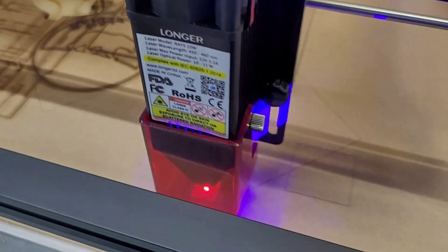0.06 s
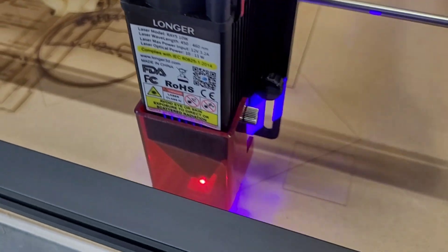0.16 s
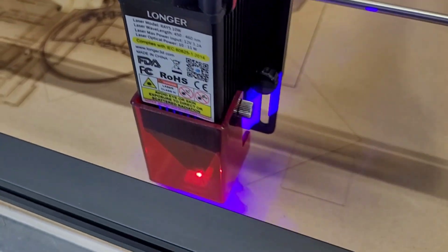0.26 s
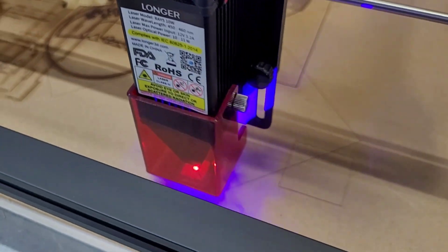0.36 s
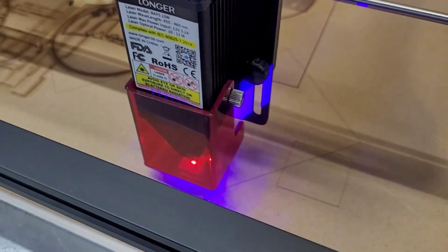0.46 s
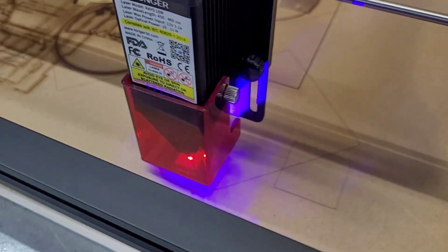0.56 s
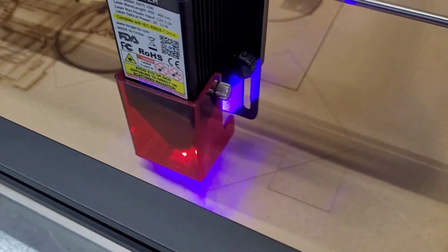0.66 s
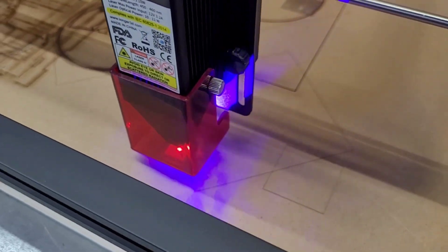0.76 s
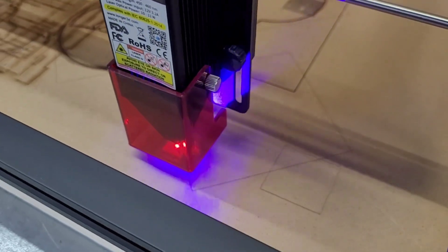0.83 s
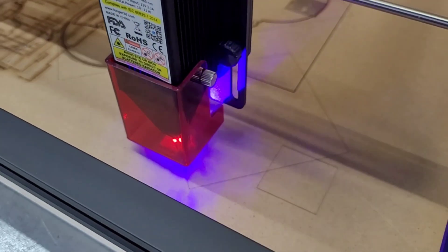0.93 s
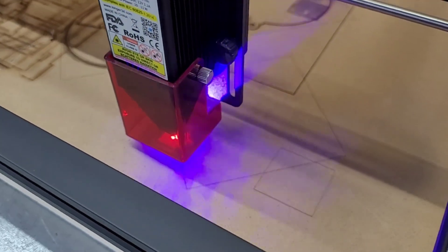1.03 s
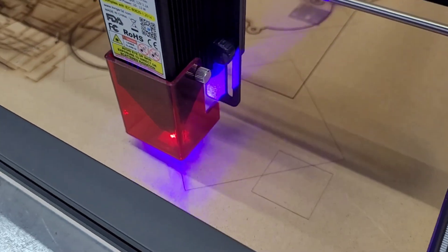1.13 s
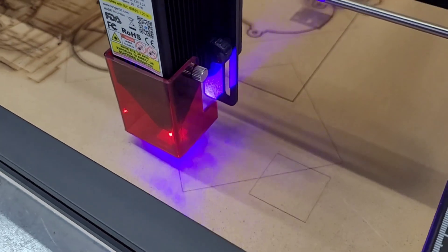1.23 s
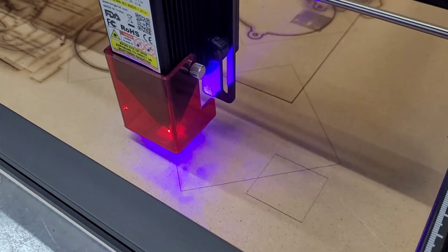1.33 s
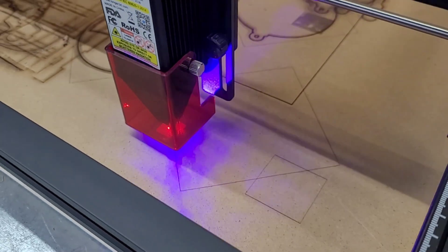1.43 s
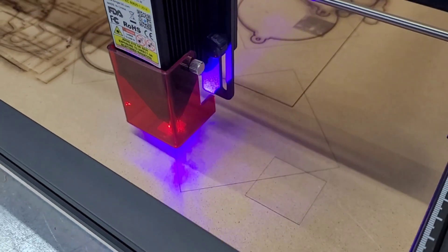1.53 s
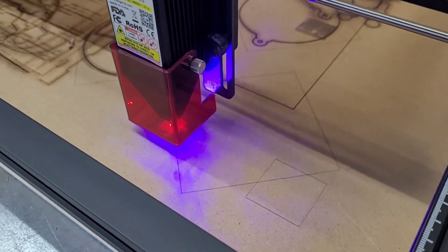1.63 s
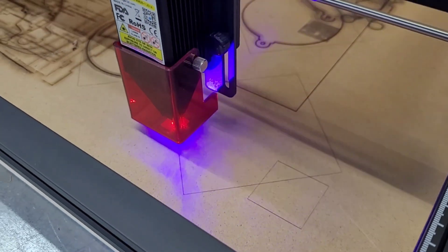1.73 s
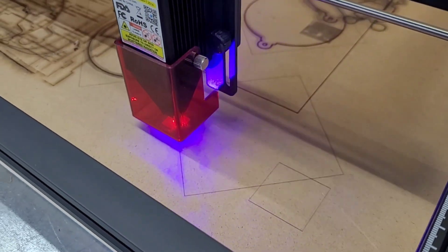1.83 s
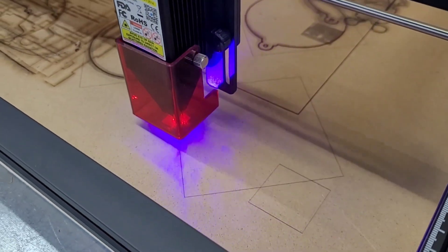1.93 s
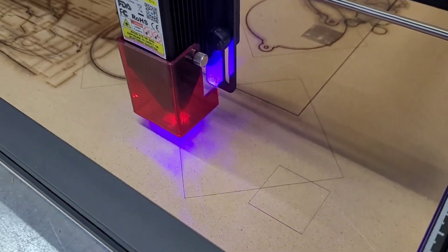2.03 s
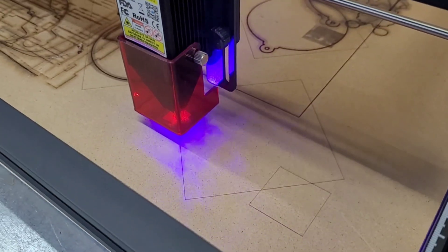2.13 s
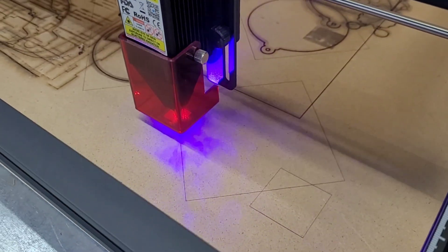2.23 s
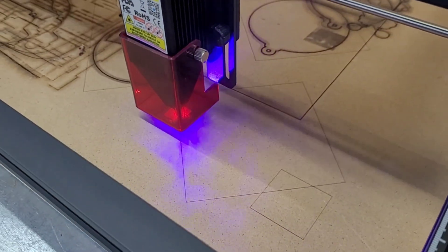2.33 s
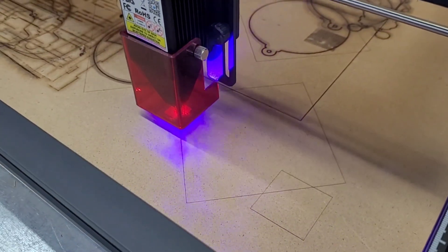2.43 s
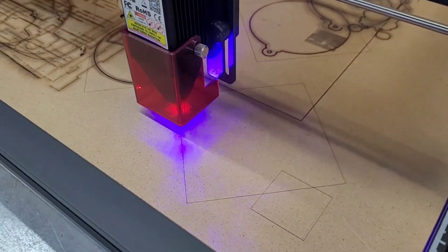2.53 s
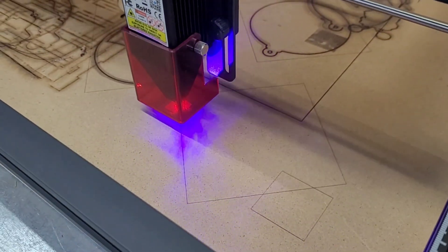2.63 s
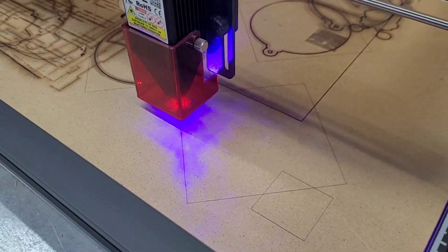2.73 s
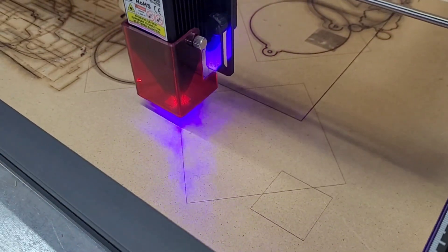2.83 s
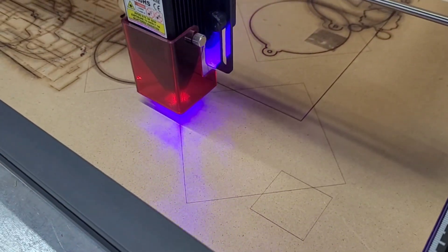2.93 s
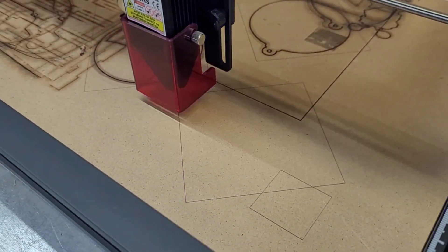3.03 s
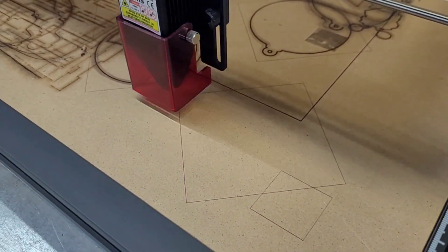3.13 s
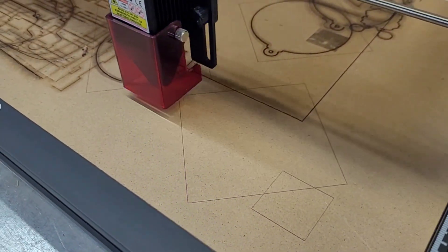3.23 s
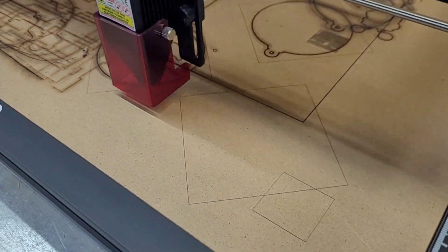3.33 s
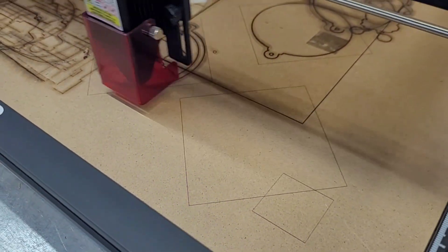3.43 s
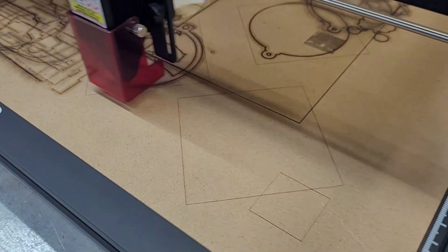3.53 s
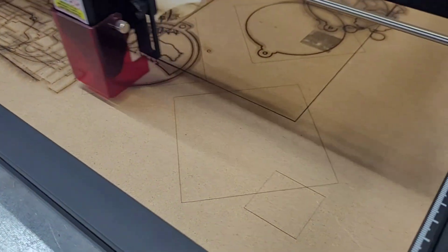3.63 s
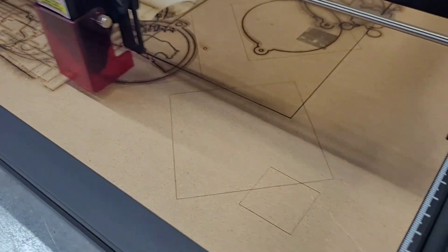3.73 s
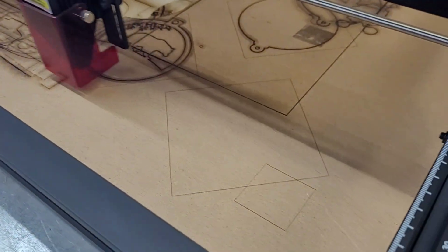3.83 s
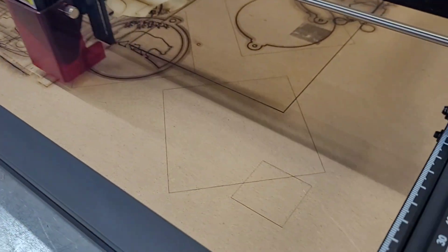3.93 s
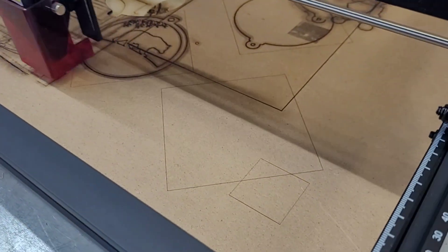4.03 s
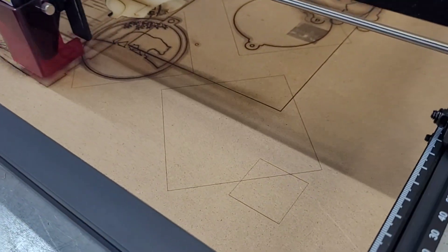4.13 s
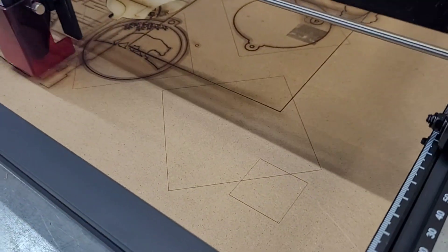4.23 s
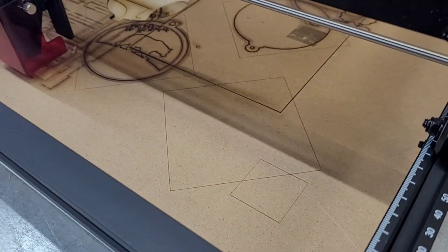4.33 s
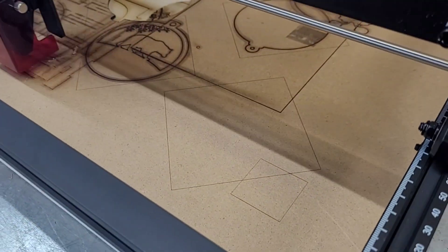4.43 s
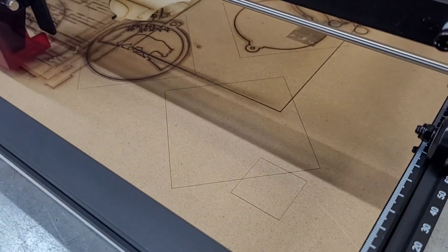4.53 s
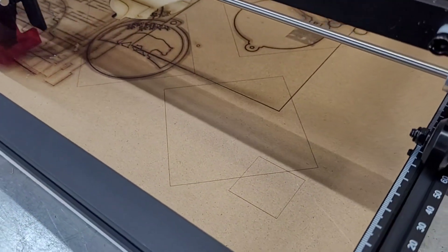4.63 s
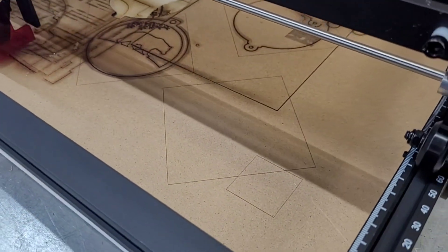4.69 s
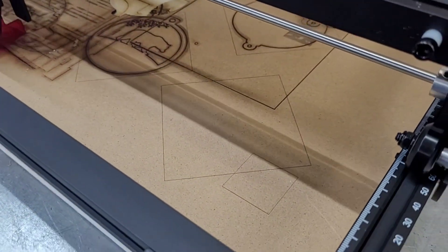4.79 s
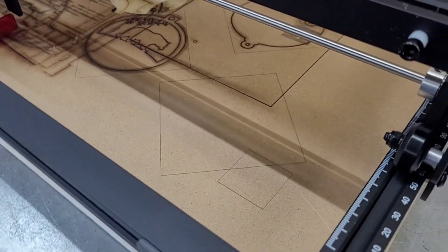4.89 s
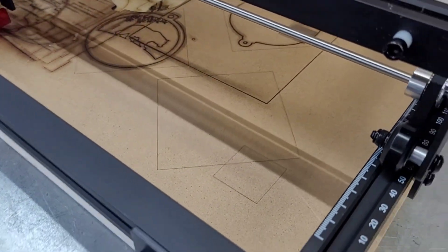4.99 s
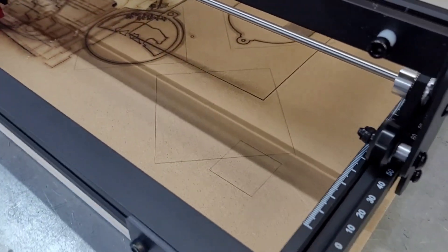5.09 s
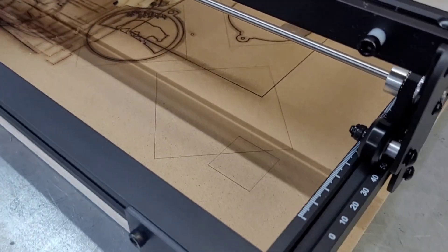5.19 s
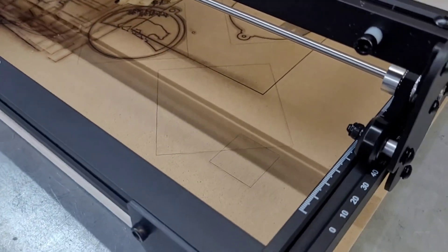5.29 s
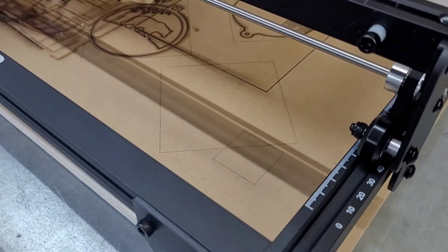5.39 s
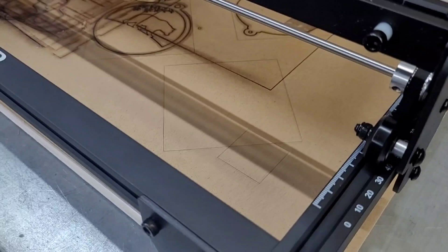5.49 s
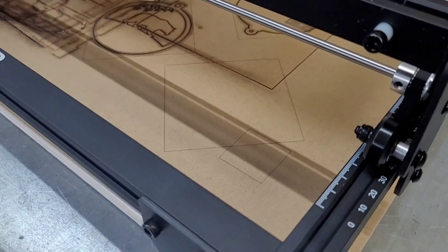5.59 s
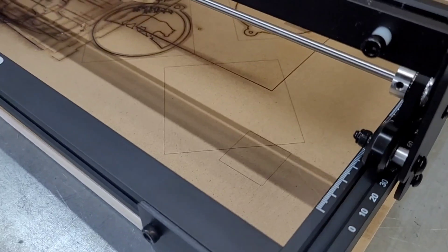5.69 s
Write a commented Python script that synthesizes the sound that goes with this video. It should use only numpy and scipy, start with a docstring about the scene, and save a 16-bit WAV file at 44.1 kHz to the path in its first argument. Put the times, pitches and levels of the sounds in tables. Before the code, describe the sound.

A small laser engraver whines at a steady, buzzy high pitch, cuts off abruptly, knocks twice, then its carriage hums away along the rail.

```python
"""Laser engraving and carriage travel

A small diode laser engraver scores a line in a wooden sheet, heard from close by in a workshop.
The pulsed beam whines at 1 kHz as a stack of harmonics, over fan noise and two slowly stepping motors.
Then the beam goes off, the head jogs twice with a knock that rings the frame's modes, and travels off
along its rail: motor and belt tones glide with its speed over a low hum, and it brakes at the end."""
import sys
import numpy as np
from scipy import signal
from scipy.fft import rfft, irfft
from scipy.io import wavfile
from scipy.ndimage import uniform_filter1d

SR = 44100
rng = np.random.default_rng(int(sys.argv[2]) if len(sys.argv) > 2 else 0)


def digitize_waveform(pressure):
    """Quantize a signal to 16-bit integers and store it at the path in sys.argv[1].

    Rows of a 2-D input are taken as channels; values are limited to [-1, 1].
    """
    field = np.atleast_2d(pressure).T
    bounded = np.clip(field, -1, 1)
    quanta = np.round(bounded * 32767).astype(np.int16)
    wavfile.write(sys.argv[1], SR, quanta)


N = 253575
TIME = np.arange(N) / SR
FREQS = np.maximum(np.arange(N // 2 + 1) * SR / N, 1)

# Hums of the workshop. Each row: frequency in Hz, level in dB.
ROOM_HUM = [(53, -68), (120, -66.5), (240, -62), (496, -64.5)]

# Air noise at the left and right listening ports. Each row: frequency in Hz, likeness of the ports 0-1,
# phase lead of the left in radians.
PORTS = [(30, 0.27, 4.5), (197, 0.85, -0.5), (475, 1, 1.5), (905, 1, 1), (1320, 1, 2.5), (2000, 0.89, 1.33),
         (2320, 0.73, 0.5), (3360, 0.12, 3), (8000, 0.067, 7)]
# Rush of air while the beam burns, at mid-cut. Each row: frequency in Hz, level in dB per Hz,
# left-right difference in dB.
BURN_AIR = [(30, -92.7, -6), (83, -88.5, -1), (222, -77.5, 2), (910, -77, 1.2), (1320, -71.5, 0),
            (1650, -76.5, 7.5), (1940, -66, 2.5), (2270, -77, 5.5), (2820, -76.5, 2.5), (4240, -89, 1.5),
            (7370, -85, -3.5), (9460, -93, 2), (10750, -88, -5), (14200, -86.5, 9.5)]
# Rush of the fan and the rolling carriage with the beam off, before IDLE_AIR_DB and the receding.
# Each row: frequency in Hz, level in dB per Hz, left-right difference in dB.
IDLE_AIR = [(25, -90.6, -4), (55, -75, -3), (169, -84.5, -2), (278, -83.5, -2), (900, -80.5, 0.5),
            (1140, -78.5, 2), (1300, -73.5, 7.5), (1650, -79.5, 5), (1930, -74, 12.5), (2390, -80, 14.5),
            (3300, -88.5, 2.5), (6540, -95.5, -0.5), (8800, -100.3, 1.5), (14300, -99.5, 5)]
# Fan blade tone, faster once the laser's load is gone. Each row: time in seconds, frequency in Hz, level in dB.
FAN_TONE = [(0, 644, -55.5), (3.11, 640, -55.5), (3.45, 655, -60), (5.75, 655, -59)]
BURN_AIR_DB_PER_S, HISS_DB_PER_S = -0.73, 0.44   # along the cut the air eases, while its hiss gains on the rush
IDLE_AIR_DB, AIR_DB_PER_S = 3, -1.5   # gain as the head sets off, and its change as the head recedes
STRAIN_HISS_DB = 3   # the rollers hiss more under strain

# Moves: two short jogs, then the long travel. Each row: start in seconds, end in seconds,
# acceleration in full speeds per second, motor level in dB.
MOVES = [(3.09, 3.18, 9, 3), (3.18, 3.238, 12, -6), (3.238, 5.8, 4.6, 1.5)]
CORNER_SPEED = .55   # share of full speed at which a move starts and ends
STRAIN_SPAN = 0.12   # the drive strains fully this far (share of full speed) below full speed

# Modes of the frame. Each row: frequency in Hz, level in dB, decay time t60 in seconds.
FRAME = [(249, -10, 0.087), (354, 4, 0.034), (438, 10, 0.029), (650, 10, 0.015), (937, 1, 0.026),
         (1330, -16, 0.016), (1840, 2, 0.038), (2680, 3, 0.0073), (3400, -35, 0.009), (6300, 1, 0.026)]
# Knocks of the carriage. Each row: time in seconds, level of the blow in dB, contact cut-off in Hz.
KNOCKS = [(1.809, -39, 650), (3.169, -42, 2500), (5.076, -48.5, 2000)]
# Taps, clicks and short rattles of belt and rollers. Each row: time in seconds, level in dB,
# centre frequency in Hz, decay in seconds.
CLICKS = [(1.8085, -27, 420, .006), (1.8095, -43, 1300, .002), (3.168, -30, 3600, .0015),
          (3.183, -51, 7000, .015), (3.266, -43, 2200, .016), (3.275, -42, 4700, .013),
          (4.901, -45, 12500, .0015), (5.076, -41, 600, .003), (5.076, -33, 1700, .002),
          (5.128, -41, 1400, .003), (5.639, -47, 10500, .003)]
# Jolts of the head. Each row: time in seconds, level in dB.
JOLTS = [(3.122, -51), (3.162, -37.5), (3.197, -46), (3.237, -62), (5.6, -51)]
SHUDDER_DB, JOLT_WIDTH_S = -47, 0.0063   # the frame shudders while the drive strains, more in a jolt

# Step rates of the two motors in Hz: nearly equal on the slanting cut, so that they beat.
CUT_STEP_HZ = [105.69, 106.31]
# First motor while cutting. Each row: multiple of the step rate, level in dB, left-right difference in dB.
MOTOR_X = [(1, -61, 2), (2, -62, -3), (3, -49, 3), (15, -62, 5), (16, -46.5, 11), (32, -63, 9),
           (48, -61, -2)]
# Second motor while cutting. Each row: multiple of the step rate, level in dB, left-right difference in dB.
MOTOR_Y = [(3, -58, 3), (16, -50.5, 8), (32, -63, 10), (48, -61, 9), (64, -64, -12), (80, -65, -1),
           (96, -68, 6)]
PORT_LEAD_S = .00017   # the left port hears the cutting motors first

# Belt and pulleys. Each row: multiple of the step rate, level in dB, left-right difference in dB.
BELT = [(1, -49, -1), (2, -58.5, -3), (3.45, -57.5, -3.5), (5.05, -65, 11), (6, -68, 10), (6.93, -72, -1),
        (7.75, -60.5, 1), (13.84, -64.5, -2)]
# Gain of the belt under full strain. Each row: multiple of the step rate, gain in dB.
BELT_STRAIN = [(1, -16), (3.5, 1), (5, 12), (7, 4), (14, 19)]
# Motor while travelling. Each row: multiple of the step rate (rounded in use), level in dB,
# left-right difference in dB.
TRAVEL_MOTOR = [(22, -62.5, 12), (30, -84, -17), (32, -51, 6), (64.4, -69, 8), (97.8, -74.5, -14)]
# Gain of the motor's whine on its way along the rail. Each row: time in seconds, gain in dB.
MOTOR_SONG = [(3.25, 1.5), (3.45, -2), (3.75, 1.5), (4.15, -3), (4.6, -1), (5.15, 3), (5.7, -4.5)]
TRAVEL_STEP_HZ, TRAVEL_LEAD_S = 72.19, .00032   # step rate at full speed; lead of the left port
BELT_DB, BELT_DB_PER_S = 0.5, -0.14   # gain as the head sets off, and its change as the head recedes
WHISTLE_HZ, WHISTLE_DB, WHISTLE_DB_PER_S = 13640, -70, -1
HUM_BUILD_S = 0.026   # the deep hum lags the speed

LASER_HZ, LASER_OFF_S = 1001.55, 3.112
# Strong partials of the whine, drifting as the head moves. Each row: multiple, level at mid-cut in dB,
# its change in dB per s, left-right difference at mid-cut in dB, its change in dB per s, reflected share,
# a dip at the left port in seconds, a dip at the right port in seconds, roughness 0-1,
# phase lead of the left in radians.
WHINE = [(1, -34, -0.35, 0, 0.5, 0.43, 1.79, 1.26, 0.09, 1.03),
         (2, -35, -3.5, 7.5, 1, 0.66, 0.11, 2.25, 0.19, 1.39),
         (3, -41.5, -2.3, 9.5, -2.5, 0.63, 0.58, 2.46, 0.19, 2.3)]
# Overtones. Each row: multiple, level at mid-cut in dB, its change in dB per s, left-right difference in dB.
OVERTONES = [(4, -59.5, 1.6, -1), (5, -52.5, 0.5, 3.5), (6, -53, -0.5, -2), (7, -49.5, 0.5, -6.5),
             (8, -62, -2.5, 2), (9, -60.5, -5, 3), (10, -59, -2.5, 3), (11, -59.5, 4.5, -2.4),
             (12, -58.5, 3, -5), (13, -54, -4.5, 2), (14, -53, 4, 7), (15, -59.5, -3, 5)]
OVERTONE_FADING = .5   # reflected share
REFLECTION_M_PER_S, SOUND_M_PER_S = .046, 343   # change of the reflected path; speed of sound
# The burn flares up once: the gains are for the fundamental, the higher partials and the hiss.
FLARE_S, FLARE_WIDTH_S = 0.14, 0.022
FLARE_FUNDAMENTAL_DB, FLARE_OVERTONE_DB, FLARE_HISS_DB = 3, 5.5, 5

CUTOFF_HZ = 15850


def from_db(db):
    """Logarithmic level: 20 dB is a factor of ten in amplitude."""
    return 10 ** (np.asarray(db) / 20)


def rms_one(x):
    """Normalisation to unit root mean square."""
    return x / np.sqrt(np.mean(x ** 2) + 1e-20)


def in_time(rows):
    """Linear interpolation of each column at every sample."""
    s, *columns = np.transpose(rows)
    return [np.interp(TIME, s, c) for c in columns]


def in_frequency(rows):
    """Interpolation of each column over logarithmic frequency."""
    hz, *columns = np.transpose(rows)
    return [np.interp(np.log(FREQS), np.log(hz), c) for c in columns]


def until(end_s, fade_s):
    """Linear gate: 1 at first, sliding to 0 at the given time."""
    return np.clip((end_s - TIME) / fade_s, 0, 1)


def bump(s, width_s):
    """Gaussian swell of height 1."""
    return np.exp(-((TIME - s) / width_s) ** 2)


def receding(db_per_s):
    """Exponential change of gain as the head travels away after the cut."""
    return from_db(db_per_s * np.maximum(TIME - LASER_OFF_S, 0))


def drift(rate):
    """Low-passed white noise: slow chance with rms 1."""
    spectrum = rfft(rng.standard_normal(N))
    return rms_one(irfft(spectrum / (1 + (FREQS / rate) ** 2), N))


def flutter(rate, channels):
    """Complex low-passed noise: random wobble of level and phase together, rms 1."""
    step = 32   # samples between computed points
    count = N // step + 2
    hz = np.fft.fftfreq(count, step / SR)
    real = rng.standard_normal((channels, count))
    imaginary = rng.standard_normal((channels, count))
    slow = np.fft.ifft((real + 1j * imaginary) / (1 + (hz / rate) ** 2))
    slow /= np.sqrt(np.mean(abs(slow) ** 2))
    return np.array([np.interp(np.arange(N) / step, np.arange(count), row) for row in slow])


def butter(x, hz, kind):
    """Second-order Butterworth response: maximally flat passband."""
    sos = signal.butter(2, min(hz, .45 * SR), kind, fs=SR, output="sos")
    return signal.sosfilt(sos, x + 1e-18)


def panned(pan_db):
    """Level difference between the ports, shared equally in dB."""
    return from_db(np.array([[.5], [-.5]]) * pan_db)


def tone(hz, pan_db, rough, rough_hz, fading=0., port_angle=0., fading_hz=1.2):
    """Modulated partial: the source roughens it, and reflections make it fade differently at each port."""
    turns = np.cumsum(hz * np.ones(N)) / SR + rng.random()
    direct = np.exp(1j * port_angle * np.array([[.5], [-.5]]))
    reflected = fading * flutter(fading_hz, channels=2) if fading else 0
    wobble = 1 + rough * flutter(rough_hz, channels=1)
    body = (direct + reflected) * wobble / np.sqrt((1 + fading ** 2) * (1 + rough ** 2))
    return np.sqrt(2) * panned(pan_db) * (body * np.exp(2j * np.pi * turns)).real


def room_hum():
    """Narrow-band hum: low tones of the workshop, broadened by a random wobble."""
    return sum(from_db(level_db) * tone(hz, 0, rough=0.62, rough_hz=7.4) for hz, level_db in ROOM_HUM)


def head_motion():
    """Uniform acceleration: moves speed up, cruise if time allows, and brake; speed, strain 0-1, motor gain."""
    speed, motor = np.full(N, CORNER_SPEED), np.zeros(N)
    for start_s, end_s, acceleration, motor_db in MOVES:
        inside_s = np.minimum(TIME - start_s, end_s - TIME)
        speed = np.maximum(speed, np.minimum(CORNER_SPEED + acceleration * inside_s, 1))
        motor = motor + from_db(motor_db) * (inside_s > 0)
    strain = np.clip((1 - speed) / STRAIN_SPAN, 0, 1) * (1 - until(LASER_OFF_S, .02))
    return speed, strain, uniform_filter1d(motor, size=600)


def air(spectrum, hiss_db, grain_db, pulsing, extra_lead_s=0):
    """Turbulence through the heat sink: a resonant rush, and above it a hiss that the beam's pulses can chop."""
    level_db, pan_db = in_frequency(spectrum)
    alike, angle = in_frequency(PORTS)
    angle = angle + 2 * np.pi * FREQS * extra_lead_s   # the left port leads more once the head has moved aside
    alike, sides = np.clip(alike, 0, 1), np.array([[1], [-1]])
    mid, side = rfft(rng.standard_normal((2, N)))
    ports = np.sqrt(1 + alike) * mid + np.sqrt(1 - alike) * side * sides
    ports = ports * np.exp(.5j * angle * sides)
    ports = ports * from_db(level_db) * panned(pan_db) * np.sqrt(SR) / 2
    low_share = 1 / (1 + (FREQS / 3500) ** 4)
    puffs = rms_one(np.exp(pulsing * np.cos(2 * np.pi * LASER_HZ * TIME)))
    rush = from_db(1.2 * drift(7.4)) * irfft(ports * low_share, N)
    hiss = from_db(hiss_db + grain_db * drift(180)) * puffs * irfft(ports * (1 - low_share), N)
    return rush + hiss


def fan():
    """Blade-passing tone, with an octave while the beam burns, and the turbulent air blown over the cut."""
    hz, level_db = in_time(FAN_TONE)
    burning = until(LASER_OFF_S, 0.0085)
    fundamental = tone(hz, -5.5, rough=0.18, rough_hz=2.9)
    octave = from_db(-6) * burning * tone(2 * hz, 0.86, rough=0.55, rough_hz=7.6, port_angle=2.1)

    from_middle_s = TIME - LASER_OFF_S / 2
    hiss_db = FLARE_HISS_DB * bump(FLARE_S, FLARE_WIDTH_S) + HISS_DB_PER_S * from_middle_s
    over_cut = np.sqrt(burning) * air(BURN_AIR, hiss_db, grain_db=2.5, pulsing=0.34)
    over_cut = over_cut * from_db(BURN_AIR_DB_PER_S * from_middle_s)

    strain = head_motion()[1]
    idle = air(IDLE_AIR, STRAIN_HISS_DB * strain, grain_db=1.0, pulsing=0,
               extra_lead_s=TRAVEL_LEAD_S - PORT_LEAD_S)
    idle = np.sqrt(1 - burning) * idle * from_db(IDLE_AIR_DB) * receding(AIR_DB_PER_S)
    return from_db(level_db) * (fundamental + octave) + over_cut + idle


def frame(force):
    """Modal superposition: the aluminium frame rings, each mode a little different at the two ports."""
    out = 0
    for hz, level_db, t60 in FRAME:
        r, w = from_db(-60 / (t60 * SR)), 2 * np.pi * hz / SR   # pole radius and angle
        ring = signal.lfilter([0, np.sin(w)], [1, -2 * r * np.cos(w), r * r], force + 1e-18)
        out = out + from_db(level_db) * ring * panned(1.5 + rng.normal(0, 4))
    return out


def carriage():
    """Forced and free vibration: jerky steps shake the frame, knocks ring it, and belt and rollers click."""
    speed, strain, _ = head_motion()
    shudder = from_db(SHUDDER_DB) * strain
    shudder = shudder + sum(from_db(level_db) * bump(s, JOLT_WIDTH_S) for s, level_db in JOLTS)
    steps = np.diff(np.floor(np.cumsum(speed * 400 / SR)), prepend=0)   # 400 per second at full speed
    steps = steps * (1 + .5 * rng.standard_normal(N))
    shake = rms_one(frame(butter(butter(steps, 290, "high"), 900, "low"))) * shudder

    force, clicks = np.zeros(N), np.zeros((2, N))
    for s, level_db, contact_hz in KNOCKS:
        impulse = 1. * (np.arange(N) == round(s * SR))
        force += from_db(level_db) * butter(impulse, contact_hz, "low")
    for s, level_db, hz, decay_s in CLICKS:
        grit = rng.standard_normal(N) + .5 * rng.standard_normal((2, N))
        octave_band = [hz / np.sqrt(2), hz * np.sqrt(2)]
        grit = rms_one(signal.sosfilt(signal.butter(2, octave_band, "band", fs=SR, output="sos"), grit))
        clicks += from_db(level_db) * (TIME >= s) * np.exp(-abs(TIME - s) / decay_s) * grit
    ringing = shake + frame(butter(force, 240, "high"))
    return butter(ringing, 190, "high") + clicks   # the slim frame radiates little bass


def cutting_motors():
    """Harmonic series and beats: two steppers sing multiples of close step rates, reaching the left port first."""
    out = 0
    for step_hz, orders in zip(CUT_STEP_HZ, [MOTOR_X, MOTOR_Y]):
        for k, level_db, pan_db in orders:
            hz = k * step_hz
            lead = 2 * np.pi * hz * PORT_LEAD_S
            out = out + from_db(level_db) * tone(hz, pan_db, rough=.12, rough_hz=20, port_angle=lead)
    return out * until(3.104, .02)


def travel_drive():
    """Order tones: motor and belt glide with speed, the deep hum builds near full speed, a thin whistle recedes."""
    speed, strain, motor = head_motion()
    belt = from_db(BELT_DB) * receding(BELT_DB_PER_S)
    motor = motor * from_db(in_time(MOTOR_SONG)[0])
    lagging = np.maximum(strain, np.interp(TIME - HUM_BUILD_S, TIME, strain))
    out = 0
    for k, level_db, pan_db in BELT:
        hz = k * TRAVEL_STEP_HZ * speed
        held_strain = lagging if round(k) == 1 else strain   # the lowest order is the deep hum
        strain_db = held_strain * np.interp(k, *np.transpose(BELT_STRAIN))
        partial = tone(hz, pan_db, rough=min(0.2 * k, .7), rough_hz=10.4, port_angle=0.15 * k)
        out = out + belt * from_db(level_db + strain_db) * partial
    for k, level_db, pan_db in TRAVEL_MOTOR:
        full_speed_hz = round(k) * TRAVEL_STEP_HZ
        lead = 2 * np.pi * full_speed_hz * TRAVEL_LEAD_S
        partial = tone(full_speed_hz * speed, pan_db, rough=0.25 + 1.2 * strain, rough_hz=50,
                       fading=0.094, port_angle=lead)
        out = out + motor * from_db(level_db) * partial
    whistle = from_db(WHISTLE_DB) * receding(WHISTLE_DB_PER_S) * (1 - strain)
    whistle = whistle * tone(WHISTLE_HZ, 11, rough=2., rough_hz=60)
    return (out + whistle) * (1 - until(3.125, 0.017))


def laser():
    """Periodic pulses give exact harmonics: each puffs off a little wood, roughened by the grain of the sheet."""
    from_middle_s, flare = TIME - LASER_OFF_S / 2, bump(FLARE_S, FLARE_WIDTH_S)
    # a reflection's path changes steadily as the head moves, so higher partials swell and dip faster
    dips_per_s = LASER_HZ * REFLECTION_M_PER_S / SOUND_M_PER_S
    strong = high = 0
    for k, level_db, db_per_s, pan_db, pan_db_per_s, share, left_dip_s, right_dip_s, rough, angle in WHINE:
        turns = round(k) * dips_per_s * (TIME - np.array([[left_dip_s], [right_dip_s]]))
        interference = np.sqrt(1 + share ** 2 - 2 * share * np.cos(2 * np.pi * turns))
        flare_db = FLARE_FUNDAMENTAL_DB if round(k) == 1 else FLARE_OVERTONE_DB
        level = from_db(level_db + db_per_s * from_middle_s + flare * flare_db)
        moving_pan_db = pan_db + pan_db_per_s * from_middle_s
        partial = tone(round(k) * LASER_HZ, moving_pan_db, rough, rough_hz=55, port_angle=angle)
        strong = strong + level * interference * partial
    for k, level_db, db_per_s, pan_db in OVERTONES:
        level = from_db(level_db + db_per_s * from_middle_s + flare * FLARE_OVERTONE_DB)
        partial = tone(round(k) * LASER_HZ, pan_db, rough=0.32, rough_hz=65, fading=OVERTONE_FADING,
                       port_angle=1.39, fading_hz=k * dips_per_s)
        high = high + level * partial
    return strong * until(LASER_OFF_S, 0.039) + high * until(LASER_OFF_S, 0.0045)


def scene():
    """Linear superposition of the workshop's hum and all the sounds of the machine."""
    return room_hum() + fan() + carriage() + cutting_motors() + travel_drive() + laser()


def record(dry):
    """Elliptic low-pass: the top is cut steeply."""
    return signal.sosfilt(signal.ellip(12, .1, 80, CUTOFF_HZ, fs=SR, output="sos"), dry)


dry = scene()
out = record(dry)
digitize_waveform(out)
```